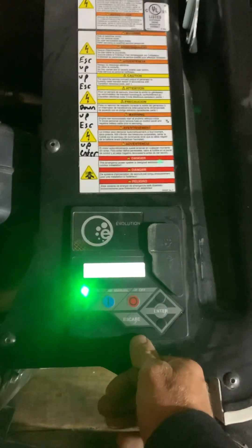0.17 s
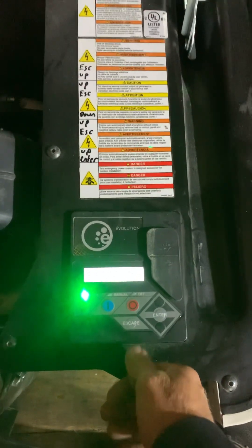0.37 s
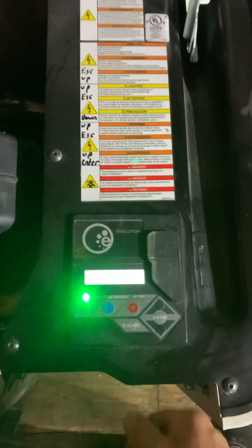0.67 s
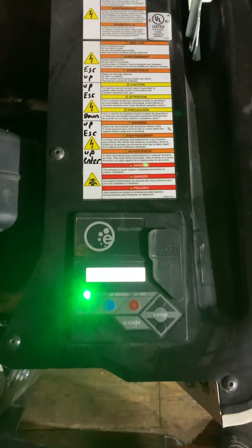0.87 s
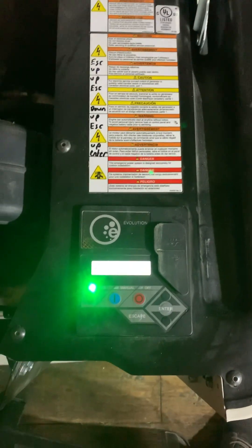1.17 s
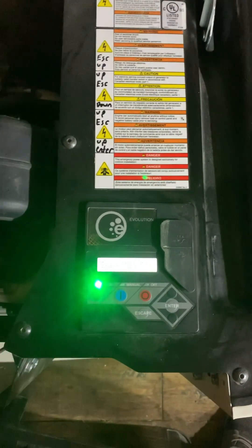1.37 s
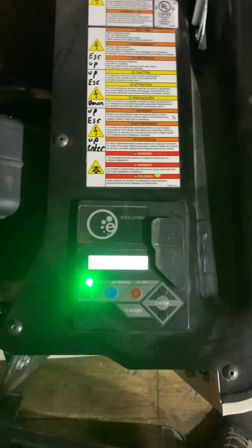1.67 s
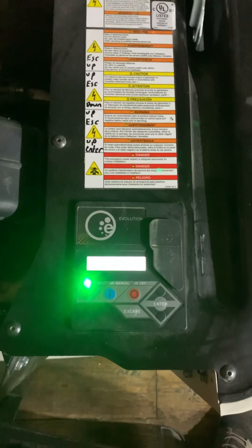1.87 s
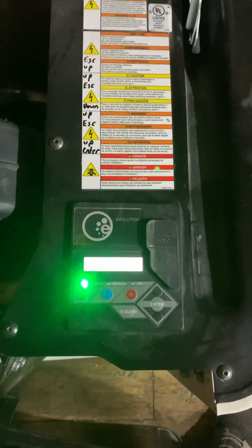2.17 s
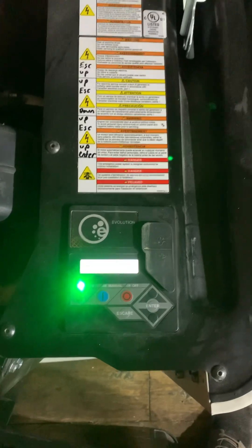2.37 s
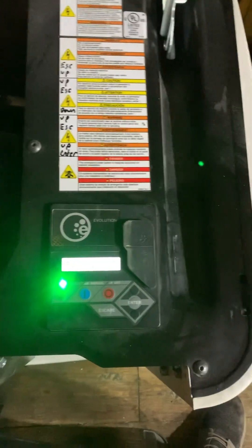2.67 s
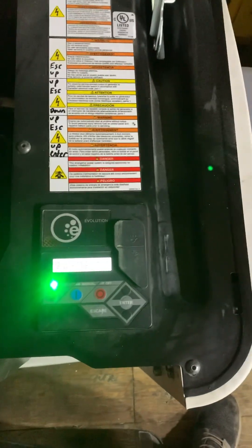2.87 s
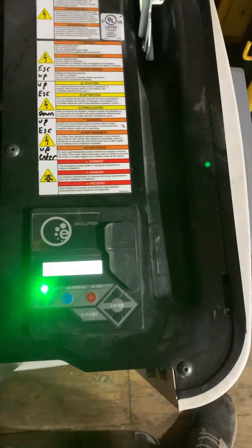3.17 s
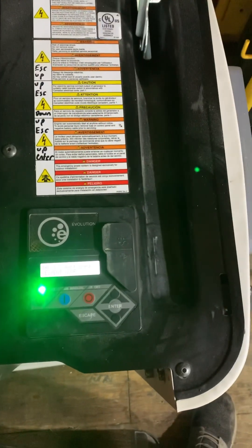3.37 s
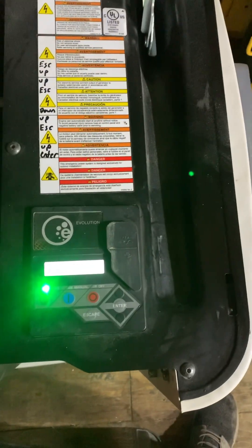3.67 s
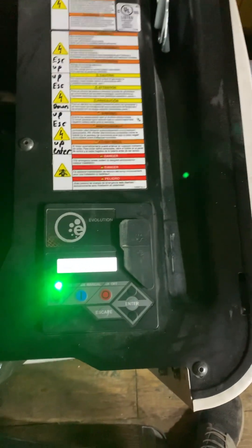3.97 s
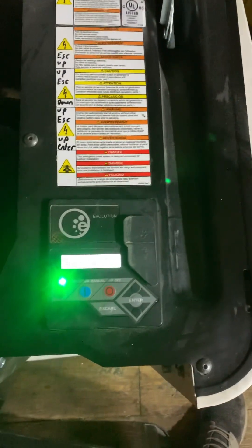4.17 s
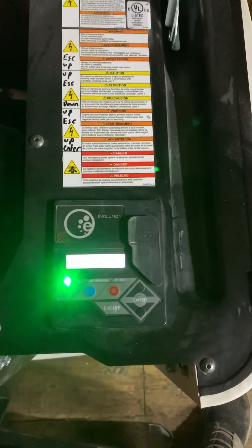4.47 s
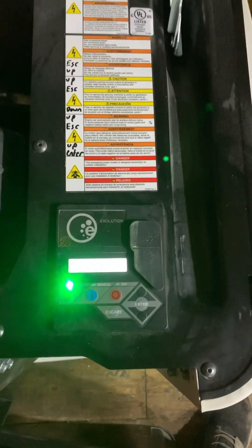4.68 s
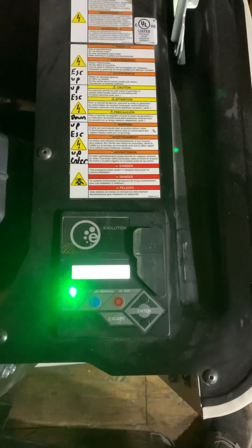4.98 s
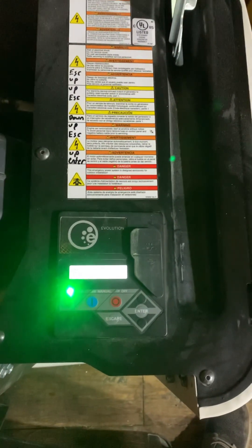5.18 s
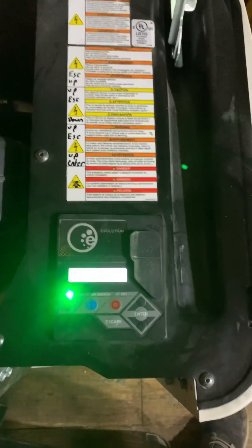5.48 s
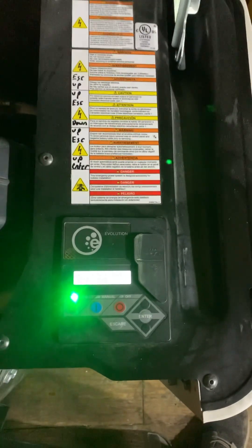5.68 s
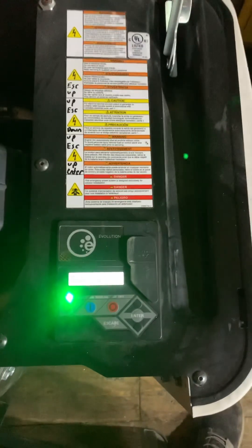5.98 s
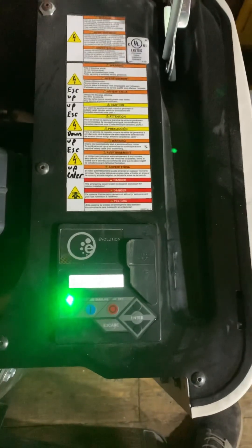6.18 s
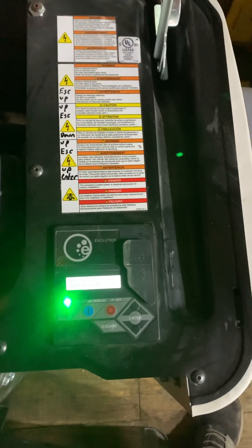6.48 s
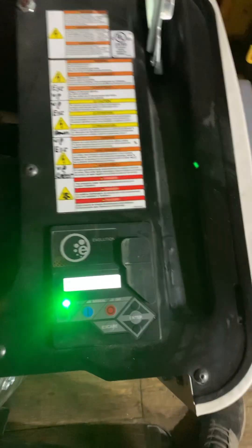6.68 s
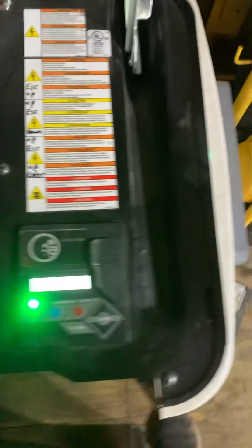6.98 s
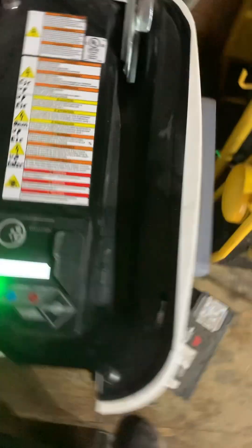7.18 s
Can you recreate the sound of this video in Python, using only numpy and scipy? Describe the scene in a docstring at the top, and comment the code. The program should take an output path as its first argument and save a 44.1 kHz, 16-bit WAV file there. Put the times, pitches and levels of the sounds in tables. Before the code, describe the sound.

A starter motor cranks a small two-cylinder engine in a lurching, rattling gear whirr for four seconds, then it fires, revs up and runs.

```python
"""Close above the open housing of a two-cylinder standby generator, two microphone ports.
First the starter cranks: gear whirr of random tooth contacts, a rattle after every compression as the
flywheel overruns the pinion, clacks that ring gear and housing, and low puffs of pumped air.
From 4.1 s single firings punch the frame and the engine speeds up: sines at multiples of the cycle rate,
gated roar and clatter. At 5.6 s the starter drops out in two knocks and spins down; the engine runs on."""
import sys
import numpy as np
from scipy import signal
from scipy.fft import rfft, irfft, next_fast_len
from scipy.io import wavfile
from scipy.ndimage import uniform_filter1d

SR = 44100
rng = np.random.default_rng(int(sys.argv[2]) if len(sys.argv) > 2 else 0)


def voltage_ratio(decibels):
    """Convert decibels (scalar or array-like) to amplitude ratios, 20 dB per decade."""
    exponent = np.asarray(decibels, float) / 20
    return 10 ** exponent


def unload_wav(signal):
    """Save mono or channel-first audio to the path in sys.argv[1] as 16-bit WAV at rate SR, clipped to [-1, 1]."""
    wavfile.write(
        sys.argv[1],
        SR,
        np.round(np.clip(np.atleast_2d(signal).T, -1, 1) * 32767).astype(np.int16),
    )


N = 323694
TIME = np.arange(N) / SR
SIZE = next_fast_len(N + SR // 4)   # transform length with room for tails
HZ = np.arange(SIZE // 2 + 1) * SR / SIZE

# All level_db columns are relative: the layers set their own trims.
# gear rattle after each compression, the cylinders in turn: peak_s, level_db, housing_ring_db
RATTLES = [(0.0, -9.5, -19), (0.1033, -5.5, -15.5), (0.285, -5.5, -16.5), (0.41, -4, -15),
           (0.596, -5.5, -14), (0.7188, -6.5, -17.5), (0.903, -5, -15.5), (1.0294, -7, -15),
           (1.2128, -7, -15.5), (1.34, -7, -15.5), (1.5234, -5.5, -16), (1.65, -5.5, -16.5),
           (1.8342, -6, -16.5), (1.9595, -6.5, -16), (2.146, -6, -15.5), (2.274, -5.5, -16.5),
           (2.459, -5, -15.5), (2.5876, -5.5, -17), (2.769, -6.5, -14), (2.898, -6.5, -17.5),
           (3.0825, -6, -15), (3.211, -8, -19), (3.395, -7, -15), (3.523, -4, -14.5), (3.707, -7, -13.5),
           (3.836, -5.5, -17), (3.9934, -24, -40), (4.091, -5, -21), (4.1894, -19.5, -44),
           (4.275, -12, -23.5), (4.356, -16, -42), (4.414, -13.5, -28), (4.479, -20, -33),
           (4.539, -11.5, -49), (4.603, -19.5, -31), (4.65, -14, -31), (4.703, -13, -26),
           (4.757, -15.5, -41), (4.8142, -17, -34), (4.8554, -20.5, -26), (4.9044, -17.5, -37),
           (4.949, -15.5, -47), (5.0044, -30, -52), (5.045, -14.5, -25), (5.092, -16.5, -33),
           (5.133, -13.5, -29), (5.178, -20, -33), (5.2144, -20, -28), (5.2674, -17, -42),
           (5.3046, -23.5, -26), (5.3494, -20, -60), (5.383, -15, -39), (5.428, -20.5, -33),
           (5.463, -18, -27), (5.522, -18, -26.5), (5.568, -14.5, -32)]
# the pinion leaves the ring gear in two knocks: peak_s, level_db, housing_ring_db
RELEASE = [(5.621, -8, -28), (5.632, -5, -26)]
# the two cylinders: decay_t60_s, rise_s, low_housing_db, high_housing_db, rebound_db
CYLINDERS = [(0.18, 0.0067, 2, 1, -11.5), (0.17, 0.007, 0, 2, -18.5)]
# bands of the rattle: low_hz, high_hz, rise_share, decay_share, change_once_firing_db
RATTLE_BANDS = [(147, 2050, 1, 1.2, 4.5), (2710, 6260, 0.74, 0.87, 0.5), (5320, 10250, 0.82, 1.005, 4.5),
                (8450, 15600, 0.4, 1.02, 7.5)]
# the slack is taken up in one clack: time_s, gear_ring_db, low_housing_db, high_housing_db
CLACKS = [(0.098, -28, -27.5, -22), (0.2836, -25, -32, -18), (0.4085, -9, -24, -38),
          (0.5936, -28, -30, -32), (0.715, -20, -36, -16.5), (0.8992, -15, -39, -29),
          (1.0269, -3, -27, -26), (1.2087, -21, -21.5, -30), (1.3373, -2, -28, -38),
          (1.5189, -10, -22.5, -37), (1.6464, -4, -30, -21.5), (1.8288, -22, -21, -25),
          (1.957, -25, -38, -25), (2.141, -11, -39, -23), (2.2695, -12, -26, -22), (2.4544, -3, -22, -24),
          (2.583, -12, -26, -37), (2.7671, -26, -21, -22), (2.895, -1, -20, -39), (3.0782, -10, -50, -20),
          (3.2077, -25, -25.5, -39), (3.3879, -19, -49, -22), (3.5213, 1, -40, -19.5),
          (3.704, -24, -26, -27), (3.8328, -7, -26, -16), (4.0851, -28, -34, -30), (4.2733, -4, -23.5, -33),
          (4.354, -1, -30, -47), (4.411, -10, -24, -43), (4.5396, 2, -50, -49), (4.6493, -12, -44, -37),
          (4.7054, -2, -30.5, -41), (5.3825, -14, -44, -29)]
# ring gear under a clack: centre_hz, width_hz, level_db
GEAR_RING = [(3750, 81, -39), (5790, 42, -12), (5900, 140, -5.5), (7240, 460, -15), (10900, 620, -17)]
# engine housing, lower and upper modes: centre_hz, width_hz, level_db
HOUSING_LOW = [(347.7, 11, -8.5), (416, 25, -13), (517.5, 15, -1), (568, 59, -4.5), (592.7, 24.5, 0)]
HOUSING_HIGH = [(928.5, 15, -4.5), (1005, 37, -1.5), (1048.3, 34, 3.5), (1406, 22, -3.5), (1473, 75, -3),
                (1636, 26, -4.5), (1786, 48, -7)]
# ring gear and starter case, narrow and wide humps: centre_hz, width_hz, above_broad_noise_db
GEAR = [(1456, 20, 7.5), (1790, 35, 1.5), (2216, 28, 3.5), (2580, 116, -4), (3060, 36, 5.5), (3280, 110, 4),
        (3480, 40, 7.5), (3720, 49, 9), (5680, 60, 6), (5913, 57, 12), (6020, 48, 8), (6300, 42, 4.5),
        (6420, 52, 3), (7850, 170, 3)]
GEAR_WIDE = [(4320, 90, 6), (4505, 90, 6), (8700, 900, 3), (9075, 110, 5), (12950, 400, 5)]
# first separate firings and the kick of the starter letting go: time_s, level_db
BANGS = [(4.104, -18.5), (4.118, -22), (4.129, -22), (4.142, -25.5), (4.285, -18), (4.317, -26.5),
         (4.342, -28), (4.424, -16.5), (4.462, -28), (4.551, -17), (4.572, -32), (4.611, -19), (4.661, -21),
         (4.721, -37), (4.778, -20.5), (4.861, -25), (5.558, -19), (5.621, -16), (5.634, -34)]
# frame and exhaust box under single firings: centre_hz, width_hz, level_db
FRAME = [(56, 12, -8), (89.4, 19, 1.5), (152, 8, -3.5), (220, 8.7, 3.5), (263, 43, -5.5), (319, 32, 8),
         (350, 16, 6.5)]
# engine speed: time_s, four_stroke_cycles_per_s
SPEED = [(4.1, 5.6), (4.5, 8.32), (4.9, 10.2), (5.3, 11.85), (5.7, 13.3), (6.1, 14.65), (6.5, 15.7),
         (6.9, 16.53), (7.1, 16.84), (7.34, 17.35)]
# swing of the throttle: time_s, level_db
THROTTLE = [(4.3, 0), (4.5, 0), (4.7, 1), (4.95, -3), (5.2, -3.5), (5.45, 1), (5.7, -0.5), (5.95, 2.5),
            (6.2, 0.5), (6.45, 0), (6.7, -1), (6.95, 0.5), (7.1, -0.5), (7.34, 2)]
# level of each multiple of the cycle rate, from the second up: level_db
ORDER_DB = [-2, 0.5, 4.5, 1, 9, -4, 6, 1, 10, 7.5, -6, 8, 2.5, 1, -1, 5, 5.5, 5.5, 3.5, 10, 6.5, 3, -0.5, 4,
            3, -13, 1, -9, 6.5, -3, -1]
# exhaust pipe as the orders pass through it: pitch_hz, level_db
PIPE = [(25, -3), (45, 2.5), (55, 7.5), (67, 5), (78, -4), (90, 1.5), (103, -4.5), (122, 4.5), (135, 6),
        (152, 0.5), (170, 0.5), (183, -3), (197, -2.5), (217, 6.5), (240, -6), (300, -4), (355, -0.5),
        (420, 3), (460, -3), (500, 13), (515, -14), (560, -4)]
# exhaust box and sheet metal in the roar: centre_hz, width_hz, above_broad_noise_db
EXHAUST = [(53, 12, 19), (123, 22, 1), (221, 12, 7), (523, 160, -4.5)]
# panels rung by the valve gear: centre_hz, width_hz, above_broad_noise_db
PANELS = [(1050, 38, 8), (1240, 50, 4), (1455, 49, 5), (1740, 45, 6), (1970, 81, 6), (2180, 46, 5)]
# gear and fan whines: start_s, end_s, start_hz, end_hz, level_db
WHINES = [(4.62, 5.58, 2245, 2215, -46), (5.62, 5.88, 2190, 2265, -40.5), (5.88, 6.15, 2300, 2400, -48),
          (6.03, 6.39, 2990, 3150, -39.5), (6.86, 7.2, 2785, 2780, -38.5), (5.88, 6.16, 1050, 1075, -42),
          (6.2, 6.45, 1150, 1180, -44), (6.76, 7.0, 1760, 1750, -45), (6.45, 6.7, 1980, 2010, -47),
          (6.78, 6.92, 1450, 1460, -43), (7.2, 7.34, 3090, 3100, -43)]
# broad spectra of the noises: frequency_hz, density_db
RATTLE_COLOUR = [(200, -1), (600, -10.5), (1500, -1.5), (2500, 3), (3300, 3), (5000, 0), (8000, -4),
                 (12000, -4.5), (14000, -6), (15000, -2.5), (16000, -2)]
WHIRR_COLOUR = [(30, -9), (40, 15), (55, 3), (75, 8), (100, 3.5), (150, 6), (220, 4.5), (400, 6), (800, 0),
                (1500, 4), (2500, 0), (3500, 0), (6000, -1), (10000, -4.5), (13800, -4), (15000, -8),
                (16000, -4.5)]
ROAR_COLOUR = [(25, -12), (50, -36), (150, 1.5), (400, 7), (700, -5.5), (1200, -3), (3000, -50)]
CLATTER_COLOUR = [(300, 1.5), (600, 3.5), (850, -6), (1100, -3), (2000, -3), (3300, -3), (4200, -13),
                  (5500, -13.5)]
FAN_COLOUR = [(2500, -8), (4000, 13.5), (6500, 9), (9000, -20), (11500, 18), (14000, -9), (16000, 29)]
# the microphone ports below the treble: frequency_hz, left_lead_rad, likeness_0_to_1, left_minus_right_db
PORTS = [(0, 0, 1, 0), (60, -.08, .997, 0), (150, -.2, .99, .3), (300, -.6, .92, 0), (700, -1.3, .55, -2),
         (1000, -.6, .35, -2.5), (1300, .4, .4, -1), (1900, .7, .72, -1.5), (2600, 2, .47, -2),
         (3300, 1.4, .86, -.5), (4000, 1.9, .8, 0)]
# treble bands with only the difference or only the sum of left and right, in turn: low_hz, high_hz
SUM_OR_DIFFERENCE = [(4350, 5050), (6350, 7450), (8400, 9500), (10450, 11550), (12600, 13650),
                     (14800, 17000)]

FIRED_S, RELEASED_S = BANGS[0][0], RELEASE[0][0]
KNOCK_AFTER_S, KNOCK_WIDTH_S = .007, .0007   # the housing takes a clack later and softer


def starter(direct):
    """Starter in mesh: tooth contacts whirr, rattle and clack, ring the housing, and air is pumped."""
    peak_s, treble_db, ring_db = np.transpose(RATTLES + RELEASE)
    touch_s = peak_s - .0065   # the first teeth touch before the rattle peaks
    cylinder = np.array(CYLINDERS)[np.arange(len(peak_s)) % 2]
    t60, rise, low_db, high_db, rebound_db = cylinder.T
    letting_go = peak_s >= RELEASED_S
    t60 = np.where(letting_go, .055, t60)
    rise = np.where(letting_go, .003, rise)
    tilt_db = .44 * rng.standard_normal(len(peak_s))   # chance between low and high modes
    low_db = ring_db + low_db + tilt_db
    high_db = ring_db + high_db - tilt_db
    rebound_s = touch_s + .034   # the gears bounce once more
    rattles = rattle(np.r_[touch_s, rebound_s], np.r_[treble_db, treble_db + rebound_db],
                     np.r_[t60, t60], np.r_[rise, rise])
    housing = housing_ring(touch_s, low_db, high_db, t60, rise)
    mix = whirr(touch_s) + rattles + housing
    return mix + direct * (clacks() + puffs(touch_s))


def rattle(s, treble_db, t60, rise):
    """Bursts of tooth contacts; each band has its own contacts, strength, rise and decay."""
    out = 0
    uneven_db = rng.normal(0, 2.0, (len(s), len(RATTLE_BANDS)))
    for (low_hz, high_hz, faster, shorter, fired_db), own_db in zip(RATTLE_BANDS, uneven_db.T):
        level_db = treble_db - 7.0 + own_db + fired_db * (s > FIRED_S)
        shape = bursts(s, level_db, shorter * t60, faster * rise) * voltage_ratio(2.0 * drift(24))
        band = signal.butter(2, [low_hz, high_hz], "band", fs=SR, output="sos")
        out = out + signal.sosfilt(band, shape * grains(7000., spread_db=1.5))
    return coloured(out, RATTLE_COLOUR, GEAR + GEAR_WIDE)


def whirr(touch_s):
    """Gear mesh: wavering contacts, quiet as the teeth part before a rattle and loose after it."""
    free_s = np.maximum(TIME - RELEASED_S, 0)
    level_db = -28.5 + 2 * np.clip((TIME - FIRED_S) / .4 + 1, 0, 1)   # swells in the 0.4 s up to the firing
    level_db -= 5 * np.minimum(free_s / .02, 1)   # lets go
    level_db -= 17 * free_s   # spins down, dB per s
    following = np.clip(np.searchsorted(touch_s, TIME), 1, len(touch_s) - 1)
    since_s = np.abs(TIME - touch_s[following - 1])
    until_s = np.abs(touch_s[following] - TIME)
    level_db += 1.5 * np.exp(-since_s / .078)
    level_db -= 3.5 * np.exp(-until_s / .0094) * (TIME < touch_s[-1])
    mesh = coloured(flicker(9000., depth_db=2.2), WHIRR_COLOUR, GEAR + GEAR_WIDE)
    return voltage_ratio(level_db + 1.2 * drift(36)) * mesh


def clacks():
    """Slack taken up at one blow: a hard strike rings the gear, a later, softer one the housing."""
    s, gear_db, low_db, high_db = np.transpose(CLACKS)
    gear = resonate(knocks(s + .001, gear_db + 10.5, .00005), GEAR_RING)
    low = resonate(knocks(s + KNOCK_AFTER_S, low_db + 26, KNOCK_WIDTH_S), HOUSING_LOW)
    high = resonate(knocks(s + KNOCK_AFTER_S, high_db + 23.5, KNOCK_WIDTH_S), HOUSING_HIGH)
    return gear + low + high


def housing_ring(touch_s, low_db, high_db, t60, rise):
    """Housing modes excited by the rattle; they swell later than the teeth."""
    low = bursts(touch_s + .006, low_db - 1.5, t60, 2.95 * rise) * steady_ring(HOUSING_LOW)
    high = bursts(touch_s + .003, high_db - 5.5, .9 * t60, 2.25 * rise) * steady_ring(HOUSING_HIGH)
    return low + high


def puffs(touch_s):
    """Air pumped out after each compression before 4 s: impulses through three low resonances."""
    pumped = np.zeros(N)
    pumped[((touch_s[touch_s < 4] + .035) * SR).astype(int)] = voltage_ratio(-7.0)
    return resonate(pumped, [(49, 8, -2.5), (135, 8, -4.0), (162, 8, -5.0)])


def bangs(direct):
    """Single firings: a pressure pulse and a short push of noise ring the frame, then the exhaust box."""
    s, db = np.transpose(BANGS)
    width_s = .0015
    shape = bursts(s - .008, db - 6.0, np.full(len(s), .2), np.full(len(s), .006))
    push = shape * rng.standard_normal(N)
    punch = -direct * knocks(s, db + 28, width_s)
    delayed = knocks(s + .0445, db + 20, 2 * width_s)   # the pulse leaves the box later
    thud = direct * resonate(delayed, [(95, 22, -7), (190, 40, -2)])
    return thud + voltage_ratio(-15.0) * resonate(push + punch, FRAME) + coloured(push, ROAR_COLOUR)


def engine_cycle():
    """Speed in cycles per s and its running sum in cycles, whole at the valve tick at 5.71 s."""
    speed, = in_time(SPEED)
    cycle = np.cumsum(speed) / SR
    return speed, cycle - cycle[round(5.71 * SR)]


def since_firing():
    """Share of a cycle since the last firing; the second cylinder fires 0.4 cycle after the first."""
    _, cycle = engine_cycle()
    return np.minimum(cycle % 1, (cycle - .4) % 1)


def engine_gain(db, per_doubling_db, throttle_share):
    """Gain from level at 14 cycles per s, dB per doubling of speed and share of the throttle swing."""
    speed, _ = engine_cycle()
    throttle_db, = in_time(THROTTLE)
    return voltage_ratio(db + per_doubling_db * np.log2(speed / 14) + throttle_share * throttle_db)


def running():
    """The engine layers fade in as it begins to fire."""
    return np.clip((TIME - 4.08) / .2, 0, 1)


def engine_tones():
    """Multiples of the cycle rate as wavering sines, coloured by the exhaust pipe."""
    speed, cycle = engine_cycle()
    pipe_hz, pipe_db = np.transpose(PIPE)
    tones = 0
    for order, db in enumerate(ORDER_DB, 2):
        pitch_hz = order * speed[::40]
        passed_db = np.interp(np.log(pitch_hz), np.log(pipe_hz), pipe_db)
        gain = voltage_ratio(db + np.repeat(passed_db, 40)[:N] + 1.5 * drift(2))
        tones = tones + gain * np.sin(2 * np.pi * (order * cycle + rng.random()))
    return running() * engine_gain(-28.5, 4, 1.1) * rms_one(tones)


def exhaust_roar():
    """Exhaust noise, puffed at each firing."""
    gated = (.5 + np.exp(-since_firing() / 1.9)) * rng.standard_normal(N)
    return running() * engine_gain(-40, 11, .4) * rms_one(coloured(gated, ROAR_COLOUR, EXHAUST))


def clatter_and_fan():
    """Valve gear contacts bunched at the firings ring the panels; fan hiss shares their gating."""
    gated = (1.1 + np.exp(-since_firing() / .08)) * flicker(9000., depth_db=.9)
    clatter = engine_gain(-29, 15.3, .99) * rms_one(coloured(gated, CLATTER_COLOUR, PANELS))
    fan = engine_gain(-47.5, 1.7, .44) * rms_one(coloured(gated, FAN_COLOUR))
    return running() * clatter + (TIME > 5.6) * fan   # the fan is heard once the starter lets go


def valve_tick():
    """One click per cycle through two treble resonances, heard once the starter is out."""
    _, cycle = engine_cycle()
    turns = (np.diff(np.floor(cycle), prepend=0) > 0) & (TIME > 5.65)
    return resonate(turns * voltage_ratio(-15 + 4 * drift(20)), [(11400, 250, 0), (6500, 600, -8)])


def whines():
    """Gear and fan tones: gliding sines, roughened by quick wander of pitch and level."""
    out = 0
    for start_s, end_s, start_hz, end_hz, level_db in WHINES:
        outside_s = np.maximum(np.maximum(start_s - TIME, TIME - end_s), 0)
        db = level_db - 200 * outside_s   # fades at 200 dB per s
        hz = np.interp(TIME, [start_s, end_s], [start_hz, end_hz]) + 20 * drift(38)
        out = out + np.sqrt(2) * voltage_ratio(db + 2.5 * drift(28)) * np.sin(2 * np.pi * np.cumsum(hz) / SR)
    return out


def grains(per_s, spread_db):
    """Tooth contacts: random clicks of uneven size, rms 1."""
    sizes = voltage_ratio(spread_db * np.minimum(rng.exponential(1, N), 5)) * rng.choice([-1, 1], N)
    return rms_one(sizes * (rng.random(N) < per_s / SR))


def flicker(per_s, depth_db):
    """Contacts whose strength wavers on its own in every band, rms 1."""
    out = 0
    for low_hz, high_hz, *_ in RATTLE_BANDS:
        edges = ([low_hz, high_hz], "band") if low_hz > 1000 else (high_hz, "low")
        band = signal.butter(2, *edges, fs=SR, output="sos")
        out = out + voltage_ratio(depth_db * drift(18.0)) * signal.sosfilt(band, grains(per_s, spread_db=2.5))
    return rms_one(out)


def bursts(times, levels_db, t60s, rises):
    """Envelope of bursts that swell over their rise time and die away."""
    out = np.zeros(N)
    for s, db, t60, rise in zip(times, levels_db, t60s, rises):
        at = max(round(s * SR), 0)
        t = TIME[:min(N - at, SR // 3)]
        decay = voltage_ratio(db - 60 * t / np.clip(t60, .03, 1))
        out[at:at + len(t)] += decay * (1 - np.exp(-t / np.clip(rise, .0005, .05)))
    return out


def knocks(times, levels_db, width_s):
    """Soft single blows, each a short rounded pulse of unit area at 0 dB."""
    out = np.zeros(N)
    out[(times * SR).astype(int)] = voltage_ratio(levels_db)
    pulse = np.hanning(round(width_s * SR) + 2)
    return signal.lfilter(pulse / pulse.sum(), [1], out)


def resonate(x, modes):
    """Parallel two-pole resonances of unit power gain at 0 dB, alternating in sign."""
    out = 0
    for k, (hz, width_hz, db) in enumerate(modes):
        r = np.exp(-np.pi * width_hz / SR)
        b = (1 - r * r) / 2 * np.array([1, 0, -1])
        a = [1, -2 * r * np.cos(2 * np.pi * hz / SR), r * r]
        gain = (-1) ** k * voltage_ratio(db) * np.sqrt(SR / np.pi / width_hz)
        out = out + gain * signal.lfilter(b, a, x)
    return out


def steady_ring(modes):
    """Modes kept ringing by dense contacts, their summed strength held even over 0.04 s."""
    x = resonate(grains(3000., spread_db=0.0), modes)
    local = uniform_filter1d(x * x, size=round(.04 * SR))
    return x * np.sqrt(np.mean(x * x) / (local + 1e-12))


def coloured(x, colour, peaks=()):
    """Smooth spectrum times resonance humps; keeps the power of white input."""
    hz, db = np.transpose(colour)
    gain = voltage_ratio(np.interp(np.log(HZ + 1), np.log(hz), db))
    for centre_hz, width_hz, rise_db in peaks:
        gain = gain * (1 + (voltage_ratio(rise_db) - 1) / (1 + (2 * (HZ - centre_hz) / width_hz) ** 2))
    return irfft(rfft(x, SIZE) * rms_one(gain), SIZE)[:N]


def drift(corner_hz):
    """Slow random wander, spread 1: twice-smoothed noise made at every 40th sample."""
    r = np.exp(-80 * np.pi * corner_hz / SR)
    slow = signal.lfilter([1], [1, -2 * r, r * r], rng.standard_normal(N // 40 + 2002))[2000:]
    return np.interp(np.arange(N) / 40, np.arange(len(slow)), rms_one(slow - slow.mean()))


def in_time(rows):
    """Columns of a curve table at every sample."""
    s, *columns = np.transpose(rows)
    return [np.interp(TIME, s, c) for c in columns]


def rms_one(x):
    """Scale to rms 1."""
    return x / np.sqrt(np.mean(x ** 2) + 1e-20)


def ports():
    """Lead, likeness and balance of the two microphone ports at every frequency."""
    hz, *columns = np.transpose(PORTS)
    lead, alike, balance_db = [np.interp(HZ, hz, c) for c in columns]
    treble = HZ > hz[-1]
    # in step at 2600 Hz, the treble lead grows half a turn every 2110 Hz
    lead = np.where(treble, np.pi * (HZ - 2600) / 2110, lead)
    alike = np.where(treble, .68, alike)
    return lead, alike, balance_db


def narrow_to_sum_or_difference(lead, alike):
    """In some treble bands the stereo narrows to the difference or the sum of left and right alone."""
    for k, (low_hz, high_hz) in enumerate(SUM_OR_DIFFERENCE):
        narrowed = np.clip(1 + np.minimum(HZ - low_hz, high_hz - HZ) / 260, 0, 1)   # 260 Hz wide edges
        lead = lead + narrowed * ((k + 1) * np.pi - lead)   # odd multiples of pi leave the difference
        alike = alike + narrowed * (1 - alike)
    return lead, alike


def scene():
    """Both ports share most of the machine, with a lag; each also hears its own part, without blows."""
    shared = starter(direct=True) + bangs(direct=True) + engine_tones() + exhaust_roar()
    shared = rfft(shared + clatter_and_fan() + valve_tick() + whines(), SIZE)
    apart = starter(direct=False) + bangs(direct=False) + exhaust_roar() + clatter_and_fan()
    apart = rfft(apart, SIZE)
    lead, alike, balance_db = ports()
    lead, alike = narrow_to_sum_or_difference(lead, alike)
    sign = np.array([[1], [-1]])   # left, right
    heard = np.sqrt((1 + alike) / 2) * shared + sign * np.sqrt((1 - alike) / 2) * apart
    placed = heard * np.exp(.5j * sign * lead) * voltage_ratio(sign * balance_db / 2)
    return irfft(placed, SIZE)[:, :N]


def band_limit(x):
    """A steep low-pass at the top of the band."""
    return signal.sosfilt(signal.butter(12, 16990, fs=SR, output="sos"), x)


def record(dry):
    """The recorder cuts the bottom below 24 Hz and the top steeply above 15720 Hz."""
    low_cut = signal.lfilter(*signal.butter(2, 24, "high", fs=SR), dry)
    top_cut = signal.ellip(8, .5, 38, 15720, fs=SR, output="sos")
    mix = signal.sosfilt(top_cut, low_cut)
    return band_limit(mix)


dry = scene()
out = record(dry)
unload_wav(out)
```